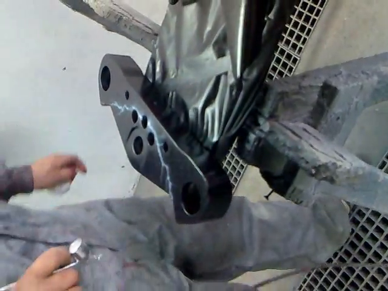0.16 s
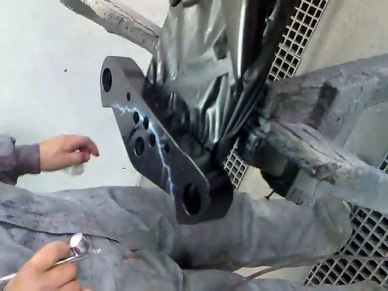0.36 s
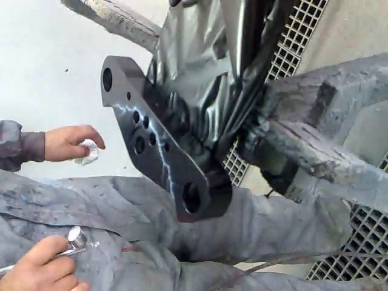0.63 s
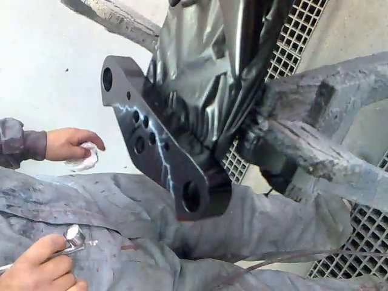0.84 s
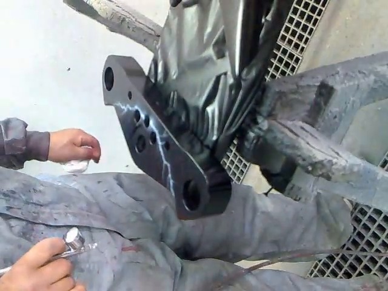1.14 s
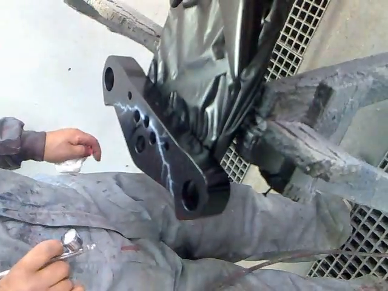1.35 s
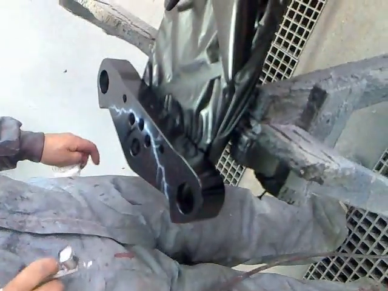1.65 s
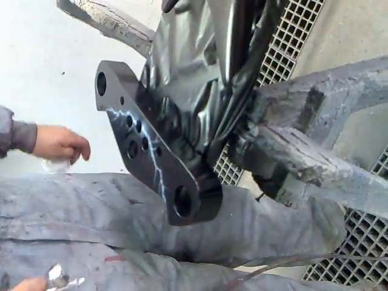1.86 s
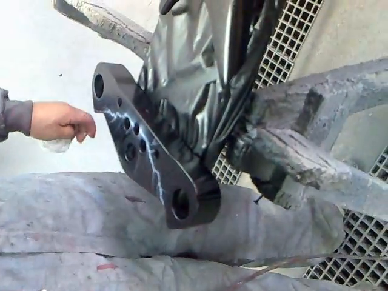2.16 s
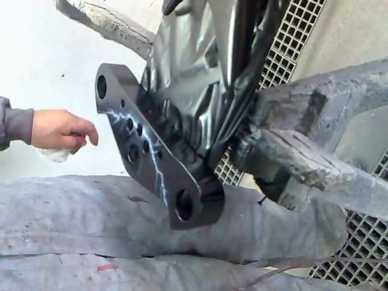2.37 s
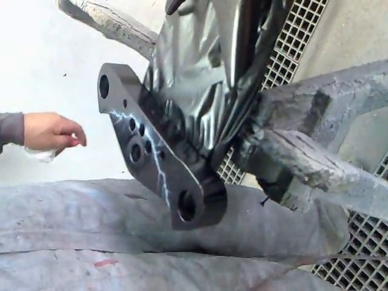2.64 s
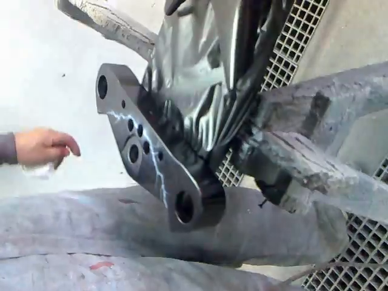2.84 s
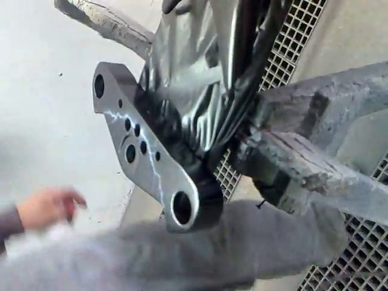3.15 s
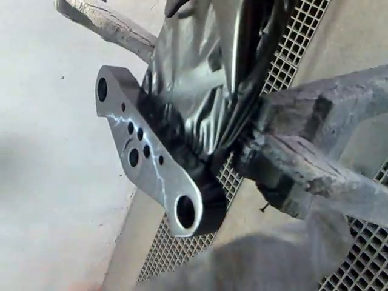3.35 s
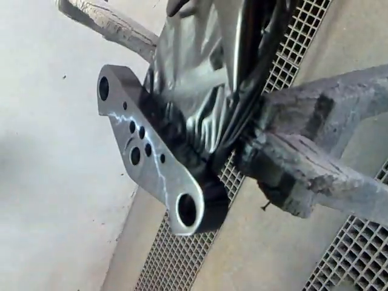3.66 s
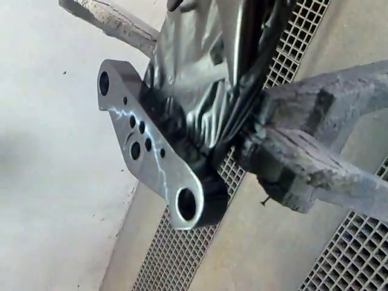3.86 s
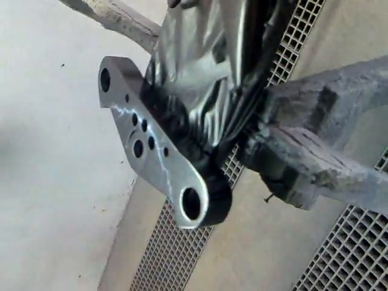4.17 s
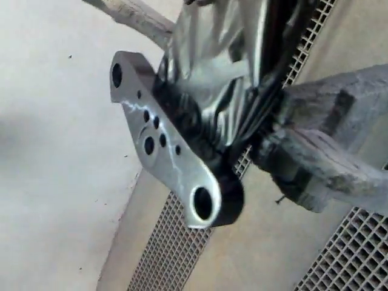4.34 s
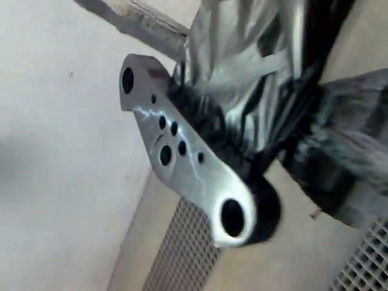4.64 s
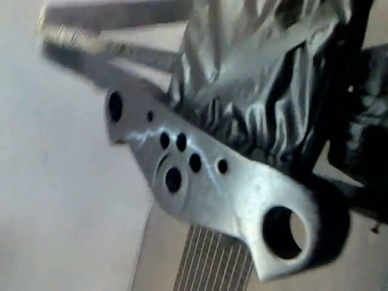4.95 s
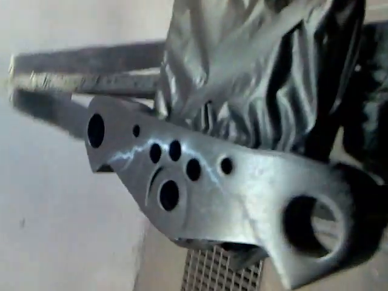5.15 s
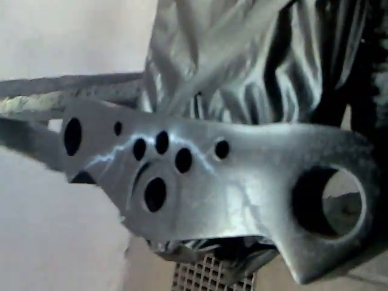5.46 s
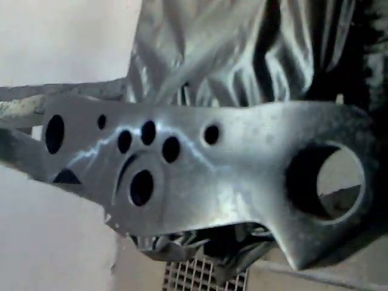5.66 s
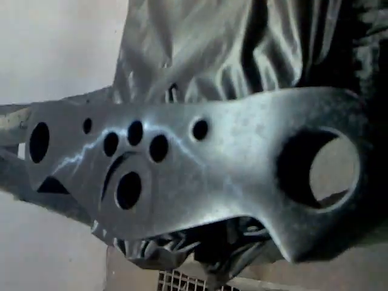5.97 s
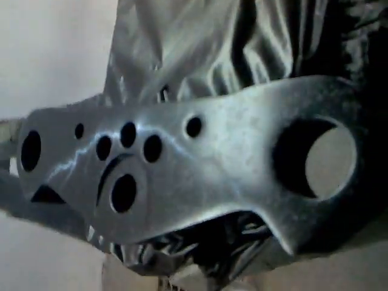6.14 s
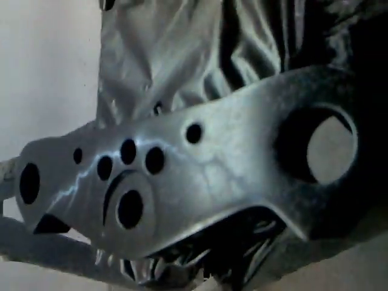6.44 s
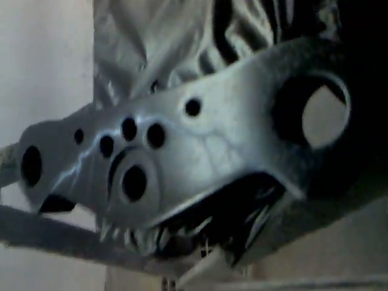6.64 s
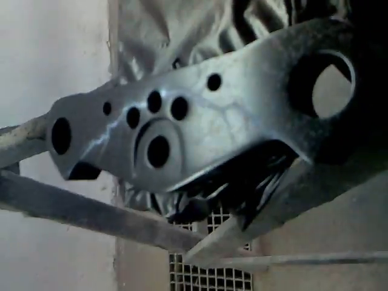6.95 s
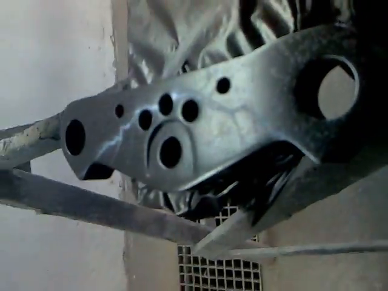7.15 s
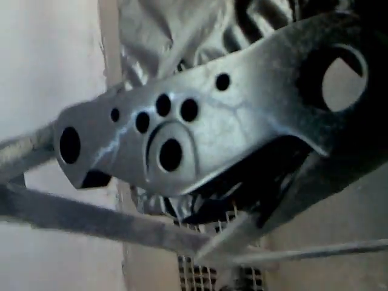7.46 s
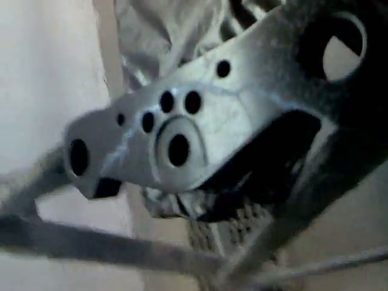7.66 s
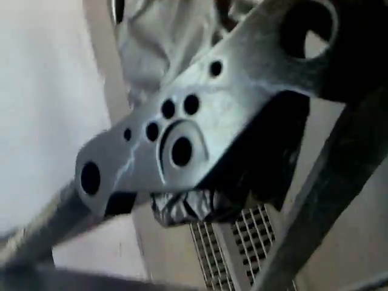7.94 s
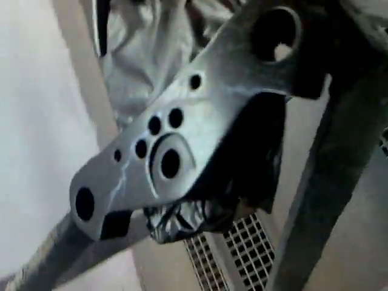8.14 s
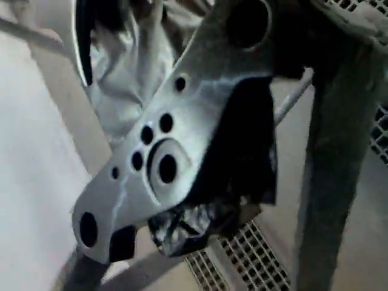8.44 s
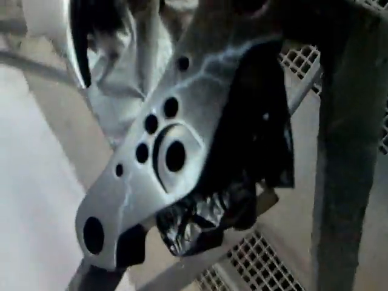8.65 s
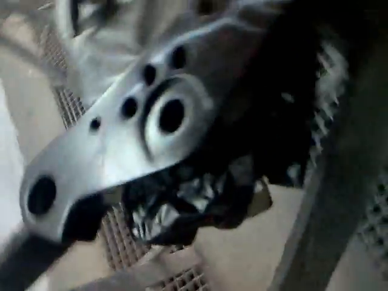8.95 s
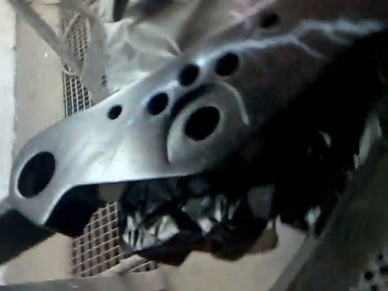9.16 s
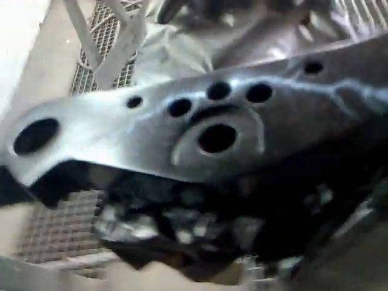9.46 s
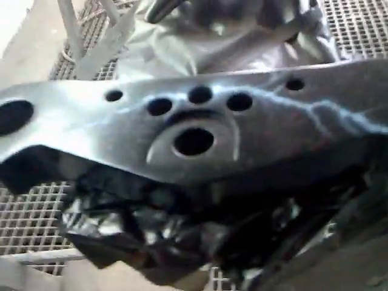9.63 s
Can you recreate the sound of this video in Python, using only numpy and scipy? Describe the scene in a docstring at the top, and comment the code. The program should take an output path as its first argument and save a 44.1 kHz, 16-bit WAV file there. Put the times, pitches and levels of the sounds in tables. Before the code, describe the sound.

A spray booth's ventilation fan hums and rumbles steadily, with dull bumps and a few sharp clicks from handling the microphone.

```python
"""In a paint spray booth, the extraction fan runs steadily: its shaft hums, its blades sing a tone,
the ducts rumble and air rushes through the floor grates. A hand-held microphone is carried through
the booth's standing waves (fixed loud and quiet spots of a tone) and down toward a grate, where the
rush is brighter. The hand shifts on the microphone's housing: dull bumps and a few short, sharp scuffs."""
import sys
import numpy as np
from scipy import signal
from scipy.fft import rfft, irfft
from scipy.io import wavfile

SR = 44100
rng = np.random.default_rng(int(sys.argv[2]) if len(sys.argv) > 2 else 0)


def materialize(psi):
    """Save the field psi as 16-bit PCM at rate SR to the path in sys.argv[1].

    A 1-D psi becomes a single channel; in a 2-D psi each row is a channel.
    """
    bounded = np.clip(np.atleast_2d(psi).T, -1, 1)
    quanta = np.round(bounded * 32767).astype(np.int16)
    wavfile.write(sys.argv[1], SR, quanta)


N = 432180

# Tones of the fan wheel: times_shaft_rate, base_level_db
WHEEL_TONES = [(1, -77), (2, -67), (3, -58), (6, -58.5), (8, -63), (9, -64.5), (11, -69.5), (12, -55.5),
               (15, -72), (16, -70.5), (17, -66), (19, -67.5), (42, -71.5), (49, -72)]
# Tones of the motor and duct panels: pitch_hz, base_level_db
MOTOR_TONES = [(84.3, -63), (99.9, -58), (249, -67), (307.4, -68.5), (490.4, -74.5), (629.8, -69.5),
               (805.3, -70.5), (1034.4, -80.5), (1148.7, -69)]
# Strong tones that form standing waves in the booth: pitch_hz, base_level_db
STANDING_TONES = [(62.45, -53), (274.6, -54.5), (327.5, -54.5), (382.9, -59), (749, -60.5), (129.4, -53.5)]
# Loud and quiet spots the microphone passes: time_s, standing_tone_index, half_width_s, change_db
CROSSINGS = [(.7, 4, 0.95, 3), (1.2, 1, .3, -6), (2.4, 5, 0.54, -6.5), (4.35, 5, 0.33, 2),
             (4.75, 3, 0.4, -11.5), (4.8, 4, .4, -14.5), (5.4, 0, 0.28, 4), (5.6, 4, 0.52, 8.5),
             (5.6, 3, .3, 5.5), (5.8, 1, 0.36, -18.5), (6.3, 2, 0.27, -9.5), (6.75, 1, 0.34, 5),
             (6.8, 5, 0.4, 4), (6.85, 4, .25, 7), (7.43, 4, .17, -25), (7.5, 2, .5, 1.5), (7.7, 0, .5, 5),
             (7.8, 5, .2, -12.5), (8.2, 4, 0.38, 7.5), (8.7, 0, 0.18, -6.5), (9.4, 3, 0.55, -16.5),
             (9.5, 2, .8, -7.5), (9.6, 1, .8, -8)]
# Strength of the duct sound along the microphone's path: time_s, base_level_db
DUCT_LEVELS = [(0, -50.5), (2.6, -50), (4.5, -50), (5.8, -52.5), (6.6, -49.5), (7.6, -46.5), (8.5, -49.5),
               (9.1, -50), (9.8, -52.5)]
# Air grows louder and brighter near the filters and grate: time_s, base_rush_db, hiss_db
AIR_LEVELS = [(0.0, -52.5, -74.0), (0.6, -54.0, -80), (1.1, -53, -74.5), (2.4, -53.0, -78.5),
              (4.2, -53.5, -77.5), (5.0, -55.5, -74.5), (5.48, -49.0, -72.0), (5.9, -55, -84),
              (6.5, -51, -69), (6.68, -44.0, -66), (7.1, -46, -60.5), (7.45, -49, -67), (7.8, -45.0, -60),
              (8.22, -46, -60.5), (8.7, -52.0, -64), (9.1, -48.0, -61.5), (9.35, -52, -68.5),
              (9.8, -51.5, -67)]

# Noise colours (how strong the low and high parts are): frequency_hz, relative_level_db
RUSH_COLOUR = [(300, -13), (520, -3), (680, -0.5), (780, -0.5), (900, -11), (1200, -12.5), (1550, -16),
               (2000, -28), (2500, -37.5), (3200, -42.5), (4200, -52.5), (5000, -59.5)]  # air through the filters
GUST_COLOUR = [(760, -7.5), (870, -4), (970, 0), (1100, -5.5), (1220, -7.5), (1380, -16), (1600, -22.5)]  # its gustier part
GRATE_COLOUR = [(900, -6.5), (1300, 1.5), (1550, 1), (2000, -10.5), (2500, -16.5), (3200, -25),
                (4200, -33.5), (5500, -41.5), (8000, -48.5), (12000, -63)]  # air through the grate
RUMBLE_COLOUR = [(15, -18), (28, -4.5), (50, 1.5), (70, 0.5), (100, -0.5), (140, 1), (175, -5),
                 (230, -21.5)]  # the booth, and the moving hand
ROAR_COLOUR = [(160, -11), (195, 3), (222, -2), (260, 1), (300, -2), (350, -1.5), (410, -4), (480, -6),
               (550, -15.5), (800, -33)]  # the ducts
THIN_COLOUR = [(3300, -12.5), (3800, 2.5), (4200, 1.5), (4700, -12), (6000, -11.5)]  # a thin, high hiss
SCUFF_COLOUR = [(500, -4), (1200, 12.5), (2000, 3), (2900, -9), (3600, -2), (4400, 1), (5400, -11.5),
                (7000, -14.5), (9000, -25.5), (15000, -26.5)]  # the housing, rubbed hard
BRUSH_COLOUR = [(1200, -3.5), (2000, 6), (3000, -9), (6000, -18.5), (8500, -26.5), (15000, -28.5)]  # the housing, rubbed lightly
SQUEAK_COLOUR = [(5700, -20), (6000, -4), (6300, -25)]  # a squeaky slip

# The hand bumps the housing: start_s, level_db, pitch_hz, relative_knock_db, relative_rebound_db
BUMPS = [(4.532, -27.5, 86.5, -18, -21), (4.590, -29.5, 90, -11, -22), (4.776, -31.5, 136, -18, -20),
         (5.088, -27, 120, -18, -22), (5.236, -31.5, 81, -9, -21), (5.363, -32, 90, -17, -17),
         (6.2708, -14.5, 186, -11, -2), (7.195, -30, 166, -18, -9), (7.414, -27, 185, 2.5, -3.5),
         (7.5739, -23.5, 184, 4, -2), (7.728, -30.5, 165, 2.5, 0.5), (8.013, -40, 110, -19, -14),
         (8.097, -33, 150, -15, -18), (8.799, -24, 113, -22, -24), (8.864, -28.5, 128, -22, -18),
         (9.7, -25.5, 45.5, -18, -13.5), (9.71, -19, 181, -10.5, -16)]
# Skin slips on the housing in three ways: middle_s, base_level_db, half_length_s
SCUFFS = [(7.4125, -48, 0.00099), (7.4195, -45.5, 0.0064), (7.438, -74, 0.013), (7.587, -51.5, 0.0048),
          (7.753, -55, 0.0069), (7.793, -60.5, 0.0076)]
BRUSHES = [(6.280, -68, 0.0058), (7.967, -67.5, 0.019), (8.222, -66, 0.0095), (8.26, -70, 0.015),
           (9.120, -73, .006)]
SQUEAKS = [(7.968, -76, 0.0036)]
# The hand carries the microphone to a new place: start_s, end_s, level_db
MOVES = [(4.5, 5.55, -46), (6.05, 6.45, -47.5), (8.4, 9.2, -49)]
# Times when the thin hiss is heard: start_s, end_s, level_db
THIN_SPELLS = [(.85, 1.68, -96), (6.45, 7.3, -93), (7.9, 8.8, -90.5)]

SHAFT_HZ = 15.63
HUM_FOLLOWS, RUMBLE_FOLLOWS = 0.6, 0.85  # share they take of the duct's and the rush's swings in dB
KNOCK_DELAY_S, KNOCK_PITCH_RATIO = 0.004, 1.96
REBOUND_DELAY_S, REBOUND_PITCH_RATIO = 0.007, 0.49
MIC_HISS_DB, CUTOFF_HZ = -97.5, 15800


def fan():
    """The wheel hums at multiples of its shaft rate; motor, panels and standing waves add more tones."""
    wheel = sum(from_db(db) * tone(round(multiple) * SHAFT_HZ, echo=0.095, rate=0.89)
                for multiple, db in WHEEL_TONES)
    motor = sum(from_db(db) * tone(hz, echo=0.084, rate=0.81) for hz, db in MOTOR_TONES)
    standing = sum(from_db(db + standing_wave_db(index)) * tone(hz, echo=0.15, rate=0.79)
                   for index, (hz, db) in enumerate(STANDING_TONES))
    duct_db, = curves(DUCT_LEVELS)
    swell = from_db(HUM_FOLLOWS * (duct_db - duct_db.mean()))
    return swell * (from_db(0.15) * (wheel + motor) + standing)


def standing_wave_db(index):
    """One tone dips and swells as the microphone crosses its quiet and loud spots."""
    return sum(db * np.exp(-((seconds() - s) / half_width) ** 2)
               for s, which, half_width, db in CROSSINGS if round(which) == index)


def tone(hz, echo, rate):
    """A steady tone plus its echoes off the walls, which slowly wander in strength and timing."""
    angle = 2 * np.pi * hz * seconds() + rng.uniform(0, 2 * np.pi)
    return unit_level((1 + echo * drift(rate)) * np.sin(angle) + echo * drift(rate) * np.cos(angle))


def air():
    """Moving air rumbles in the booth, roars in the ducts, rushes in the filters, hisses at the grate."""
    rush_db, hiss_db = curves(AIR_LEVELS)
    duct_db, = curves(DUCT_LEVELS)
    rumble_db = -49 + RUMBLE_FOLLOWS * (rush_db - rush_db.mean())
    rumble = from_db(rumble_db) * swirls(RUMBLE_COLOUR, flutter_db=2.5, rate=45)
    roar = from_db(duct_db + 0.85) * swirls(ROAR_COLOUR, flutter_db=2.5, rate=24)
    rush = from_db(rush_db - 3) * swirls(RUSH_COLOUR, flutter_db=2.5, rate=59)
    gusts = from_db(rush_db - 6.5) * swirls(GUST_COLOUR, flutter_db=4, rate=44)
    hiss = from_db(hiss_db) * swirls(GRATE_COLOUR, flutter_db=2.5, rate=46)
    return rumble + roar + rush + gusts + hiss


def swirls(colour, flutter_db, rate):
    """Noise that sinks and swells as swirls of air pass; the biggest swells are capped."""
    return noise(colour) * from_db(flutter_db * np.minimum(drift(rate), 1.9))


def hand_bumps():
    """Each bump is a push, then a higher knock of hard contact, then a low swing back of the housing."""
    out = np.zeros(N)
    for s, db, hz, knock_db, rebound_db in BUMPS:
        knock = from_db(knock_db) * push(s + KNOCK_DELAY_S, hz * KNOCK_PITCH_RATIO)
        rebound = from_db(rebound_db) * push(s + REBOUND_DELAY_S, hz * REBOUND_PITCH_RATIO)
        out += from_db(db) * (push(s, hz) + knock + rebound)
    return out


def push(start_s, hz, peak_cycles=0.63, steepness=3.8):
    """The pushed housing barely rings: it swells and dies in about a cycle and a half."""
    out, t = np.zeros(N), seconds()
    span = (t >= start_s) & (t < start_s + 6 / hz)
    cycles = (t[span] - start_s) * hz
    age = cycles / peak_cycles
    swell = (age * np.exp(1 - age)) ** steepness
    out[span] = swell * np.sin(2 * np.pi * cycles)
    return out


def skin_rub(slips, colour):
    """Skin slips over the plastic, and each slip makes a very short swell of noise."""
    pressure = sum(from_db(db) * np.exp(-np.minimum(((seconds() - s) / half_length) ** 2 / 2, 20))
                   for s, db, half_length in slips)
    return pressure * noise(colour)


def carrying_rumble():
    """The hand makes a low rumble while it moves the microphone."""
    return spells(MOVES, fade_s=0.09) * noise(RUMBLE_COLOUR)


def thin_hiss():
    """A faint, thin hiss comes and goes."""
    return spells(THIN_SPELLS, fade_s=0.12) * noise(THIN_COLOUR)


def noise(colour):
    """Noise of the given colour, falling by 36 dB an octave past both ends of its table."""
    hz, db = np.transpose(colour)
    octaves = np.log2(np.maximum(np.fft.rfftfreq(N, 1 / SR), 1))
    listed = np.log2(hz)
    octaves_outside = np.abs(octaves - np.clip(octaves, listed[0], listed[-1]))
    gain = from_db(np.interp(octaves, listed, db) - 36 * octaves_outside)
    return unit_level(irfft(rfft(rng.standard_normal(N)) * gain, N))


def drift(rate):
    """A smooth random wobble, about 1 in size, that turns roughly `rate` times a second."""
    step, warm_up = 40, 4000  # one point every 40 samples; the first points are dropped
    memory = np.exp(-2 * np.pi * step * rate / SR)
    jitter = rng.standard_normal(N // step + warm_up + 2)
    smooth = signal.lfilter([1], [1, -2 * memory, memory * memory], jitter)[warm_up:]
    return np.interp(np.arange(N) / step, np.arange(len(smooth)), unit_level(smooth))


def spells(rows, fade_s):
    """A volume that fades in, holds and fades out once for each row."""
    t = seconds()
    return sum(from_db(db) * np.clip(np.minimum(t - start, end - t) / fade_s + 0.5, 0, 1)
               for start, end, db in rows)


def curves(rows):
    """Join a table's points in time with straight lines, one curve for each level column."""
    times, *columns = np.transpose(rows)
    return [np.interp(seconds(), times, column) for column in columns]


def seconds():
    """The time of every sample."""
    return np.arange(N) / SR


def from_db(db):
    """Turn decibels into a number to multiply by."""
    return 10 ** (np.asarray(db) / 20)


def unit_level(x):
    """Scale a signal so that its average level (rms) is 1."""
    return x / np.sqrt(np.mean(x ** 2) + 1e-20)


def scene():
    """Fan and air fill the booth; the hand's sounds reach the microphone directly."""
    scuffs = from_db(5) * skin_rub(SCUFFS, SCUFF_COLOUR)
    brushes = skin_rub(BRUSHES, BRUSH_COLOUR)
    squeak = skin_rub(SQUEAKS, SQUEAK_COLOUR)
    booth = fan() + air() + thin_hiss()
    hand = hand_bumps() + carrying_rumble() + scuffs + brushes + squeak
    return (booth + hand)[None]  # one channel


def record(dry):
    """The microphone adds its own faint hiss, and the highest treble is cut away."""
    hiss = from_db(MIC_HISS_DB) * rng.standard_normal(dry.shape)
    treble_cut = signal.ellip(10, 0.1, 70, CUTOFF_HZ, fs=SR, output="sos")
    return signal.sosfilt(treble_cut, dry + hiss)


dry = scene()
out = record(dry)
materialize(out)
```